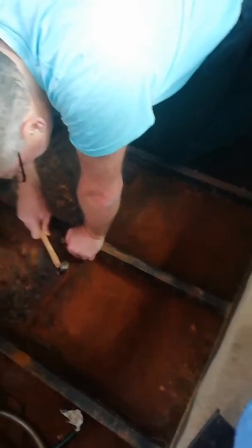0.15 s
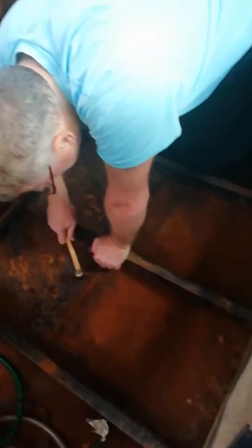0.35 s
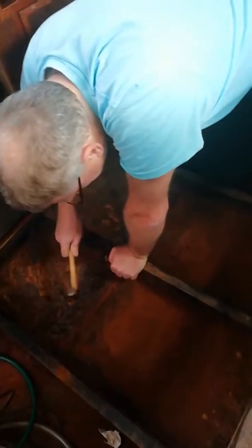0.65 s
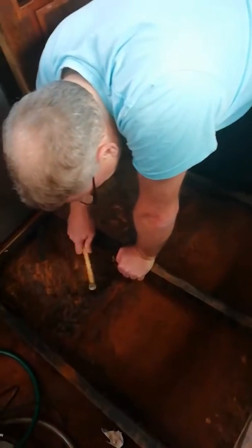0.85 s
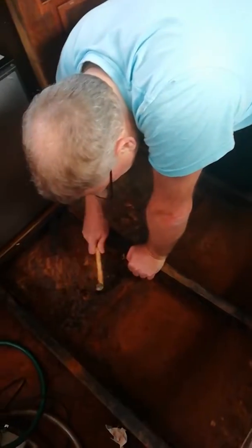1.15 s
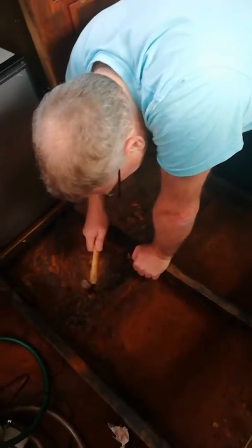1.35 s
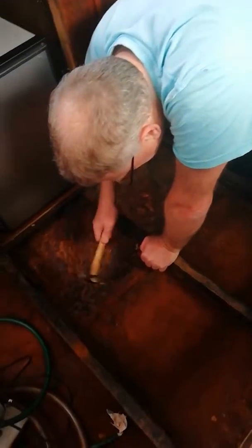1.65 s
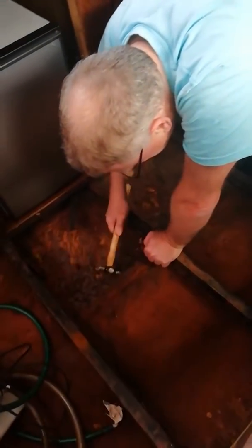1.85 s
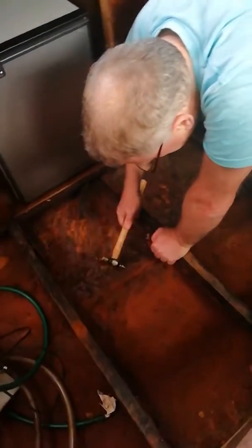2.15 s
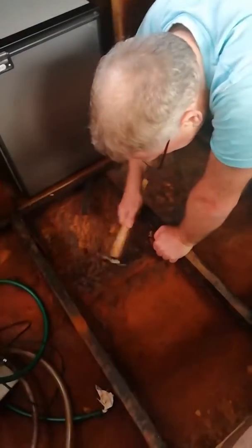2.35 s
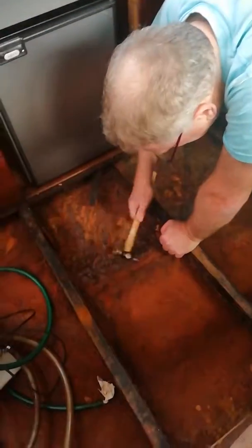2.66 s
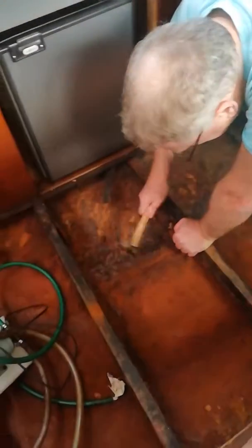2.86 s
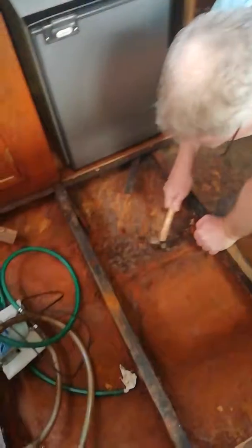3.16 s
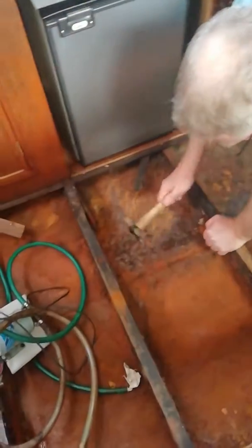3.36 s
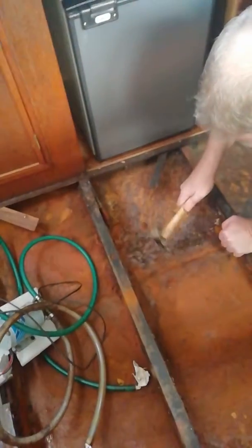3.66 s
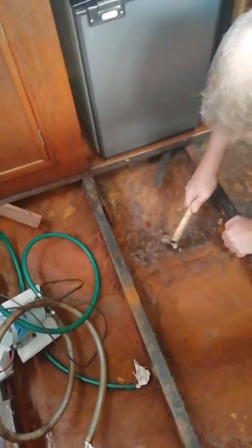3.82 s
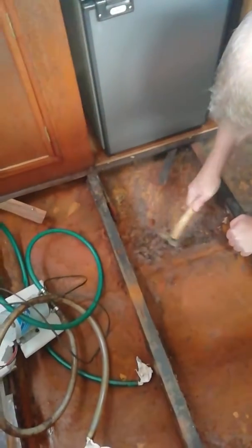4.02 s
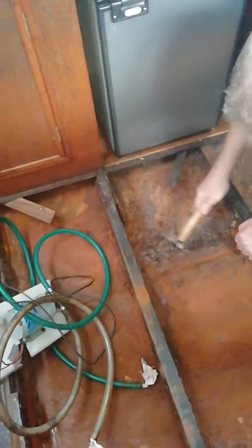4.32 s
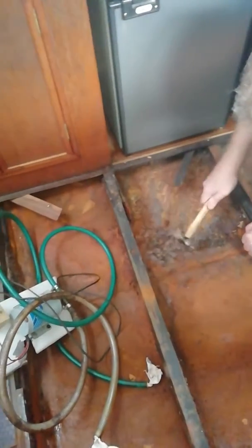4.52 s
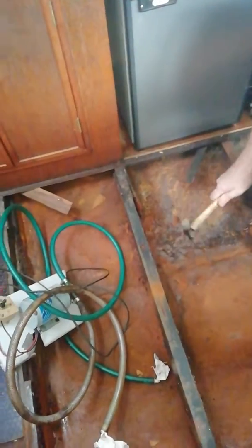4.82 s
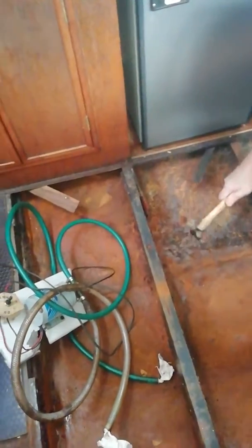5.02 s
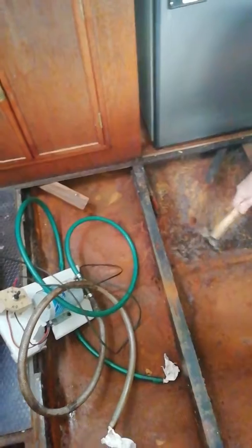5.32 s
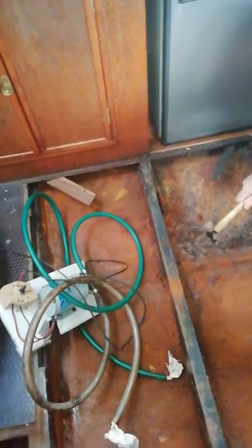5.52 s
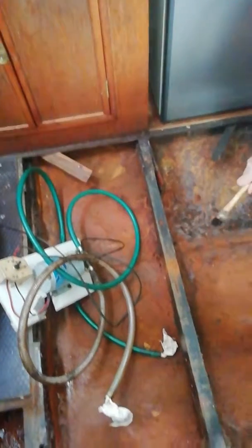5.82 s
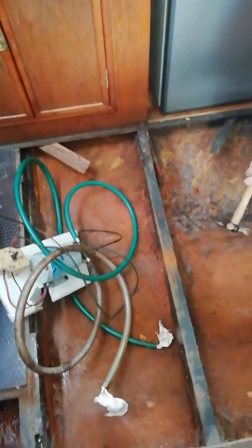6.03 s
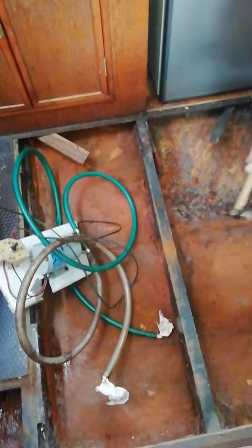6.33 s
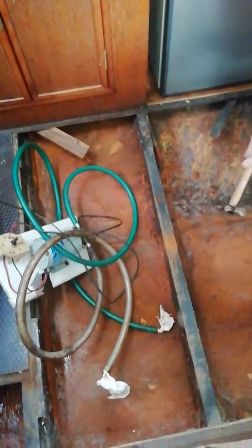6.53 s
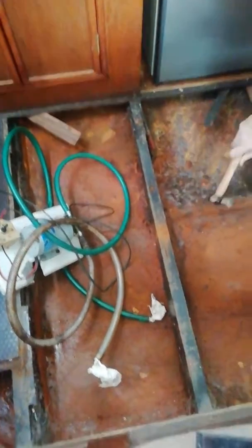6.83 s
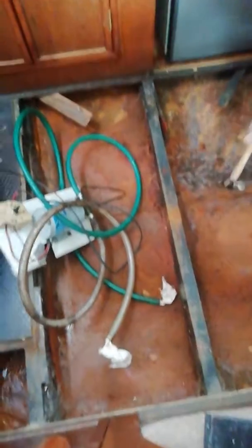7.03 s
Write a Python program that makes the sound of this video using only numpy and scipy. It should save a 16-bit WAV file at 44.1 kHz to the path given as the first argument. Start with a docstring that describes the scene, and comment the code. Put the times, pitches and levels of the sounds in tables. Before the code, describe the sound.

A small hammer chips at rusted steel plating inside a boat cabin, three to four blows a second. Each blow combines a dull plate thud, a midrange knock or clank and a crisp crack of crust, dying within a fraction of a second. Early on, flakes tick and loose grit skitters between blows; later the gaps are cleaner. Close handheld microphone, bright and slightly rounded on peaks, over a very faint room hiss.

```python
"""Chipping rust from boat plating

A small hammer chips rust from the steel bottom plating of a boat, about 3.5 blows a second, in a small cabin.
Each blow layers decaying noise bands, plate modes, a struck-spot clank and a sharp snap; the head may ping.
Between blows, filtered noise bursts make single flakes click, and clumped grains make loose grit skitter.
The debris also excites a faint singing at the head's partials, over a steady noise floor for the cabin.
"""
import sys
import numpy as np
from scipy import signal
from scipy.fft import rfft, irfft
from scipy.io import wavfile
from scipy.ndimage import uniform_filter1d

SR = 44100
rng = np.random.default_rng(int(sys.argv[2]) if len(sys.argv) > 2 else 0)


def to_wav(s):
    """Save 16-bit WAV."""
    ch = np.atleast_2d(s).T  # columns
    pcm = np.round(np.clip(ch, -1, 1) * 32767)  # PCM
    wavfile.write(sys.argv[1], SR, pcm.astype(np.int16))


N = 316638
BLOW_TIME = np.arange(int(.4 * SR)) / SR   # clock of one blow or flake [s]
SIDES = np.array([[1], [-1]])   # opposite signs for left and right


def from_db(db):
    """Decibels to gain."""
    return 10 ** (np.asarray(db) / 20)


def rms_one(x):
    """Scale to rms 1."""
    return x / np.sqrt(np.mean(x ** 2) + 1e-20)


def at_hz(points, hz):
    """Read (frequency, value) points on a log-frequency axis."""
    points = np.array(points)
    return np.interp(np.log(hz), np.log(points[:, 0]), points[:, 1])


def fade(t, t60):
    """Exponential decay that loses 60 dB in t60 seconds."""
    return np.exp(-np.log(1000) * t / t60)


def add(out, s, sound):
    """Mix a stereo sound in at time s, trimming what falls outside the scene."""
    start = round(s * SR)
    first, last = max(start, 0), min(start + sound.shape[-1], N)
    out[:, first:last] += sound[:, first - start:last - start]


def butterworth(x, order, hz, kind):
    """Butterworth filter: low, high or band."""
    return signal.sosfilt(signal.butter(order, hz, kind, fs=SR, output="sos"), x)


def third_octave(x, hz):
    """Band-pass a third of an octave wide."""
    return butterworth(x, 2, [hz / 2 ** (1 / 6), hz * 2 ** (1 / 6)], "band")


def resonance(x, hz, width_hz):
    """Two-pole resonance with gain 1 on top."""
    radius, angle = np.exp(-np.pi * width_hz / SR), 2 * np.pi * hz / SR
    zeros = np.array([1, 0, -1]) * (1 - radius * radius) / 2
    return signal.lfilter(zeros, [1, -2 * radius * np.cos(angle), radius * radius], x)


# stereo image: how alike left and right are
# (frequency [Hz], correlation [-1 to 1])
STEREO_LIKENESS = [(60, 1), (180, 0.98), (270, 0.92), (350, .45), (480, -0.41), (750, -0.19), (1150, 0.34),
                   (1700, 0.27), (2600, -0.18), (3600, 0.22), (6000, -0.061)]


def spread(mid, side, hz):
    """Mix two unrelated signals to left and right: alike in the bass, diffuse in the treble."""
    alike = np.clip(at_hz(STEREO_LIKENESS, hz), -.99, .99)
    return (np.sqrt(1 + alike) * mid + np.sqrt(1 - alike) * side * SIDES) / np.sqrt(2)


def coloured(x, spectrum):
    """Give a white stereo signal a third-octave spectrum, rolled off below its first point."""
    lowest_hz = spectrum[0][0]
    hz = np.maximum(np.fft.rfftfreq(x.shape[-1], 1 / SR), 15)
    # a third octave is about .23 of its centre frequency wide
    gain = from_db(at_hz(spectrum, hz)) * np.sqrt(SR / 2 / (.23 * np.maximum(hz, lowest_hz)))
    gain = gain * np.minimum(hz / lowest_hz, 1) ** 2
    mid, side = rfft(x)
    return irfft(spread(mid, side, hz) * gain, x.shape[-1])


THUD_BELOW_HZ, KNOCK_OCTAVES, CRACK_ABOVE_HZ = 670, 0.71, 7050   # where the three parts of a blow sound


def strength(hz):
    """Gain of every blow at one frequency: the plate's low thud, the spot's broad knock, the crust's crack."""
    thud_db, knock_db, knock_hz, crack_db = np.transpose(HAMMER_BLOWS)[1:5]
    thud = from_db(thud_db) ** 2 / (1 + (hz / THUD_BELOW_HZ) ** 2)
    knock = from_db(knock_db) ** 2 / (1 + (np.log2(hz / knock_hz) / KNOCK_OCTAVES) ** 2)
    crack = from_db(crack_db) ** 2 / (1 + (CRACK_ABOVE_HZ / hz) ** 4)
    return np.sqrt(thud + knock + crack)


# tone of an average blow, before its own colour
# (frequency [Hz], relative level per third octave [dB])
BLOW_TONE = [(45, -56), (80, -47.5), (125, -40.5), (220, -28.5), (400, -26.5), (800, -28), (1700, -29),
             (2700, -32), (4000, -34.5), (6300, -41.5), (9000, -40.5), (11500, -59), (15000, -61)]
# how long plate and cabin ring
# (frequency [Hz], t60 [s])
PLATE_CABIN_RING = [(60, 0.63), (160, 0.3), (420, 0.24), (1100, 0.18), (3000, 0.16), (9000, 0.16)]
BANDS_HZ = 40 * 2 ** (np.arange(27) / 3)


def clatter(level_db, crack_db, crack_t60, crack_hz, build_cycles, late_cycles, uneven_db):
    """The crust cracks, then countless plate and cabin modes die away; slow bending waves delay the lows."""
    out = 0
    white = rng.standard_normal((len(HAMMER_BLOWS), 2, 2, len(BLOW_TIME)))
    for k, hz in enumerate(BANDS_HZ):
        treble = hz ** 2 / (hz ** 2 + crack_hz ** 2)
        t = np.maximum(BLOW_TIME - (1 - treble) * late_cycles / hz, 0)
        envelope = fade(t, at_hz(PLATE_CABIN_RING, hz)) + treble * from_db(crack_db) * fade(t, crack_t60)
        envelope = envelope * (1 - np.exp(-t / (.0003 + build_cycles / hz)))
        # read backwards, the filtered noise starts at full strength
        band = third_octave(white[:, k % 2], hz)[..., ::-1] * envelope
        # rms 1 over a tenth of a second
        band = band / np.sqrt(np.sum(band ** 2, axis=-1, keepdims=True) / (SR / 10))
        band_db = level_db + at_hz(BLOW_TONE, hz) + uneven_db * rng.standard_normal(len(HAMMER_BLOWS))
        gain = from_db(band_db) * strength(hz)
        out = out + spread(band[:, :1], band[:, 1:], hz) * gain[:, None, None]
    return out


# strongest modes of the plating
# (frequency [Hz], relative level [dB], t60 [s])
PLATE_MODES = [(85.06, -37, 0.8), (127.1, -27.5, .36), (165.7, -32.5, 0.53), (215.3, -13, 0.15),
               (273.7, -29, 0.51), (285.3, -23, 0.28), (381.2, -15.5, 0.18), (465.6, -18.5, 0.15),
               (477, -26, 0.26), (554, -21, 0.16), (628, -32, .24), (687, -23, 0.25), (1030, -21.5, 0.13),
               (1156, -28, 0.22), (1320, -42, 0.053), (1670, -22.5, 0.088), (1847, -30, 0.15),
               (2420, -26.5, 0.16)]


def plate_modes(level_db, spot_db, spot_detune, build_cycles):
    """Each blow lands on another spot, so each mode answers with a new strength and a slightly new pitch."""
    t, out = BLOW_TIME, 0
    for hz, mode_db, t60 in PLATE_MODES:
        spot, detune, turn = rng.standard_normal((len(HAMMER_BLOWS), 3)).T[:, :, None, None]
        # the phase offset between the sides sets their likeness
        apart = np.arccos(np.clip(at_hz(STEREO_LIKENESS, hz), -1, 1)) * rng.choice([-1, 1]) / 2
        phase = 2 * np.pi * hz * (1 + spot_detune * detune) * t + np.pi * turn + apart * SIDES
        envelope = fade(t, t60) * (1 - np.exp(-t * hz / build_cycles))
        gain = from_db(level_db + mode_db + spot_db * spot) * strength(hz)[:, None, None]
        out = out + np.sin(phase.astype("f")) * envelope * gain
    return out


def snap(level_db, crush_s, length_s, low_db, low_hz):
    """The head crushes through the crust and meets steel: one sharp noise spike, crush_s into the blow."""
    white = rng.standard_normal((len(HAMMER_BLOWS), 2, len(BLOW_TIME)))
    burst = white * np.exp(-((BLOW_TIME - crush_s) / length_s) ** 2)
    top = butterworth(burst, 4, [4500, 9000], "band") * strength(7000)[:, None, None]
    low = resonance(resonance(burst[:, :1], low_hz, 2 * low_hz), low_hz, 2 * low_hz)
    spike = top + from_db(low_db) * low * strength(low_hz)[:, None, None]
    energy = np.sum(spike ** 2, axis=(1, 2), keepdims=True)
    return from_db(level_db) * spike / np.sqrt(energy / (4 * length_s * SR))


# ring of the hammer head
# (frequency [Hz], relative level [dB], t60 [s])
HEAD_PARTIALS = [(5329, -8, .22), (7477, -10, .2), (11280, 0, .235)]


def head_ring(t, beat_hz, beat_share):
    """The steel head's few thin partials, each a close pair that beats."""
    turn, out = np.array([[0], [1]]), 0   # phase lead of the right side [rad]
    for hz, db, t60 in HEAD_PARTIALS:
        main = np.sin(2 * np.pi * hz * t + turn)
        twin = np.sin(2 * np.pi * (hz + beat_hz) * t - turn)
        out = out + from_db(db) * (main + beat_share * twin) * fade(t, t60)
    return out


# hammer blows; all levels are relative
# (time [s], plate thud level [dB], struck-spot knock level [dB], knock pitch [Hz], crust crack level [dB],
#  clank pitch [Hz], clank level [dB], head ping level [dB], first snap level [dB])
HAMMER_BLOWS = [(-0.03, -4.5, -1, 875, 4.5, 784, -5, -60, -30),
                (0.2886, -0.5, 4.5, 740, 0.5, 750, 4, -43.5, -15),
                (0.8454, -3, -4.5, 1015, 11, 1630, 4.5, -73, -5.5),
                (1.1989, -2, 4.5, 806, 3.5, 1730, 1, -56, -1),
                (1.5326, -4.5, 4, 685, 8.5, 2760, 2.5, -57, -12),
                (1.8372, 1.5, -1, 1900, 2, 960, 6.5, -69.5, -23),
                (2.119, -3.5, -5, 2350, 5.5, 640, 3, -47, 0),
                (2.4047, -12, 5, 2540, -1.5, 1730, 1.5, -56.5, 0.5),
                (2.6761, -4.5, 4, 738, -1, 2420, -2.5, -37, -14),
                (2.934, -1, 2, 1264, 2, 580, 3.5, -41, -12),
                (3.1697, -2.5, -4, 896, -5, 5750, 3.5, -50.5, -17),
                (3.5295, 1, 0.5, 2780, 6.5, 915, 5.5, -55.5, -7),
                (3.7979, -5, -1, 400, 6.5, 3260, 5, -43, -18),
                (4.065, -7.5, -6.5, 2660, 10.5, 1176, 5, -35, -4),
                (4.3612, -7, -6.5, 2400, 3.5, 1840, 6, -48, -16),
                (4.6664, 1.5, -9.5, 2440, 0, 2470, 1, -56.5, -14),
                (4.91, 0.5, 1, 1810, 0.5, 2400, 0.5, -62.5, 1),
                (5.1388, -2, -0.5, 1910, 4.5, 2040, 3.5, -59, 1),
                (5.367, -7.5, 1, 2240, 3, 1200, 0.5, -57, 0),
                (5.633, 3, 4, 3650, -3.5, 802, 2.5, -60.5, -15.5),
                (5.9269, -5, -10.5, 2750, 4.5, 1990, 9, -60.5, -16),
                (6.227, -4, 5, 1910, -3.5, 5170, 2, -48.5, -4),
                (6.483, -10.5, -2.5, 1290, 5, 2020, 10, -62, -3.5),
                (6.745, -27, 8.5, 2540, 5.5, 1850, 0, -42, -13),
                (7.0156, -20, 6, 1790, 0, 1680, 2.5, -62, -9)]
CLANK_Q = 6.7   # the struck spot's own pitch dies within a few cycles


def hammer(clank_db, ping_db):
    """All blows, each coloured by the spot it lands on, with the thin ring of the steel head."""
    bodies = clatter(level_db=-2.0, crack_db=0.5, crack_t60=0.024, crack_hz=1383,
                     build_cycles=0.95, late_cycles=1.7, uneven_db=0.8)
    bodies = bodies + plate_modes(level_db=-1.0, spot_db=3.0, spot_detune=0.0049, build_cycles=0.68)
    spikes = snap(level_db=-16.5, crush_s=.0013, length_s=0.00022, low_db=5.5, low_hz=1590)
    ping = head_ring(BLOW_TIME, beat_hz=24, beat_share=0.1)
    out = np.zeros((2, N))
    for blow, body, spike in zip(HAMMER_BLOWS, bodies, spikes):
        s, (spot_hz, spot_db, head_db, snap_db) = blow[0], blow[5:]
        # the body passes at gain 1 already, so only the boost is added
        clank = (from_db(clank_db + spot_db) - 1) * resonance(body, spot_hz, spot_hz / CLANK_Q)
        add(out, s, body + clank + from_db(snap_db) * spike + from_db(ping_db + head_db) * ping)
    return out


# noise floor of the quiet cabin
# (frequency [Hz], level per third octave [dB])
CABIN_FLOOR = [(25, -84.5), (55, -80), (100, -81), (260, -71.5), (450, -82), (1300, -77.5), (3000, -80.5),
               (9000, -84), (15000, -95.5)]


def quiet_cabin():
    """Steady noise with the cabin's spectrum, under everything."""
    return coloured(rng.standard_normal((2, N)), CABIN_FLOOR)


# tone of rust debris on steel, flakes and grit alike
# (frequency [Hz], relative level per third octave [dB])
DEBRIS_TONE = [(400, -45), (900, -48), (2000, -47.5), (4000, -47.5), (7000, -47.5), (10000, -47),
               (15000, -67)]
# rust flakes landing or snapping
# (time [s], relative level above the split [dB], relative level below the split [dB])
RUST_FLAKES = [(0.1296, -26.5, -19.5), (0.945, -28, -21), (1.1348, -29, -28), (1.1721, -7, -30),
               (1.466, -39, -21), (1.983, -21, -60), (2.0002, -8, -59), (2.0705, -20.5, -64),
               (2.91, -38.5, -41), (3.1454, -33, -32.5), (4.135, -25, -12.5), (4.573, -37.5, -59),
               (5.5573, -41, -56), (5.6092, -32.5, -39), (5.7588, -37, -34), (6.418, -20.5, -31),
               (6.608, -26, -37), (6.681, -28.5, -42), (6.7061, -30, -23.5), (6.933, -33.5, -52),
               (7.0933, -13.5, -15.5)]


def flakes(level_db, mids_db, click_t60, cabin_db, cabin_t60, split_hz):
    """Single flakes: a tiny noise click and its wash in the cabin, balanced above and below split_hz."""
    t, out = BLOW_TIME, np.zeros((2, N))
    envelope = fade(t, click_t60) + from_db(cabin_db) * fade(t, cabin_t60)
    for s, top_db, low_db in RUST_FLAKES:
        noise = rms_one(coloured(rng.standard_normal((2, len(t))), DEBRIS_TONE))
        low, top = butterworth(noise, 2, split_hz, "low"), butterworth(noise, 2, split_hz, "high")
        click = from_db(level_db + top_db) * top - from_db(mids_db + low_db) * low
        add(out, s, click * envelope)
    return out


def dragged_head(debris, sing_db, width_hz):
    """The head drags through the debris and sings faintly: the debris rings resonances at its partials."""
    return sum(from_db(db + sing_db) * resonance(debris, hz, width_hz) for hz, db, t60 in HEAD_PARTIALS)


SPILL_ATTACK_S, SPILL_SAG_DB_PER_S, SPILL_RELEASE_T60 = 0.02, 35, 0.23


def spill(t, length_s):
    """Flow of one spill of grit: quick rise, slow thinning, then it comes to rest after length_s."""
    running = np.maximum(t, 0)
    rise = np.minimum(running / SPILL_ATTACK_S, 1)
    return rise * from_db(-SPILL_SAG_DB_PER_S * running) * fade(np.maximum(t - length_s, 0), SPILL_RELEASE_T60)


# spills of loose grit sliding over the steel
# (start time [s], length before release [s], relative level [dB], coarse crumbs relative to fine dust [dB])
GRIT_SPILLS = [(0.373, 0.1, -29, 2), (0.48, 0.033, -32.5, 6.5), (0.934, 0.08, -32.5, -7),
               (1.128, 0.052, -30, -1), (1.263, 0.018, -37.5, -3.5), (1.459, 0.079, -34, -8.5),
               (1.688, 0.034, -43, -11.5), (1.91, 0.069, -43.5, -0.5), (1.982, 0.11, -43, -0.5),
               (2.307, 0.043, -44, -19), (4.123, 0.018, -38.5, -2), (4.398, 0.068, -34, 7),
               (6.112, 0.035, -58, -10), (6.364, 0.15, -52.5, -7), (6.55, 0.024, -40, -7),
               (6.602, 0.15, -60.5, -3.5), (6.937, 0.08, -63.5, 9)]
COARSE_BELOW_HZ = 2300


def grit(level_db, grains_per_s, size_db, clump_db, cabin_db, cabin_t60):
    """Crumbs of rust skitter in clumps: random clicks of uneven size, smeared by the cabin's decay."""
    t = np.arange(N) / SR
    clumps = rms_one(uniform_filter1d(rng.standard_normal(N), size=350))   # swells of some 8 ms
    grain_db = size_db * np.minimum(rng.exponential(1, N), 4) + clump_db * clumps
    sizes = from_db(grain_db) * rng.choice([-1, 1], N)
    clicks = sizes * (rng.random(N) < grains_per_s / SR)
    envelope = fade(BLOW_TIME, 0.0031) + from_db(cabin_db) * fade(BLOW_TIME, cabin_t60)
    echo = rng.standard_normal((2, len(BLOW_TIME))) * envelope
    smeared = signal.fftconvolve(clicks[None], echo, axes=1)[:, :N]
    grains = rms_one(coloured(smeared, DEBRIS_TONE))
    coarse = butterworth(grains, 3, COARSE_BELOW_HZ, "low")
    fine = butterworth(grains, 3, COARSE_BELOW_HZ, "high")
    out = np.zeros((2, N))
    for s, length_s, db, coarse_db in GRIT_SPILLS:
        out += from_db(level_db + db) * spill(t - s, length_s) * (fine + from_db(coarse_db) * coarse)
    return out


def scene():
    """Hammer, debris and the quiet cabin."""
    blows = hammer(clank_db=2.5, ping_db=0.0)
    debris = flakes(level_db=-6.5, mids_db=-11.5, click_t60=0.0026,
                    cabin_db=-10.0, cabin_t60=.16, split_hz=6800)
    debris = debris + grit(level_db=-2.0, grains_per_s=330, size_db=2.5, clump_db=2.5,
                           cabin_db=-14.5, cabin_t60=0.22)
    debris = debris + dragged_head(debris, sing_db=3.5, width_hz=27)
    return blows + debris + quiet_cabin()


CUTOFF_HZ = 16300


def record(dry, port_hz=8800, port_width_hz=1300, port_gain=3.72):
    """The microphone ports resonate in the treble; peaks are rounded and the top is cut."""
    ported = dry + port_gain * resonance(dry, port_hz, port_width_hz)
    rounded = 1.3 * np.tanh(ported / 1.3)
    return signal.sosfilt(signal.ellip(10, .2, 70, CUTOFF_HZ, fs=SR, output="sos"), rounded)


dry = scene()
out = record(dry)
to_wav(out)
```